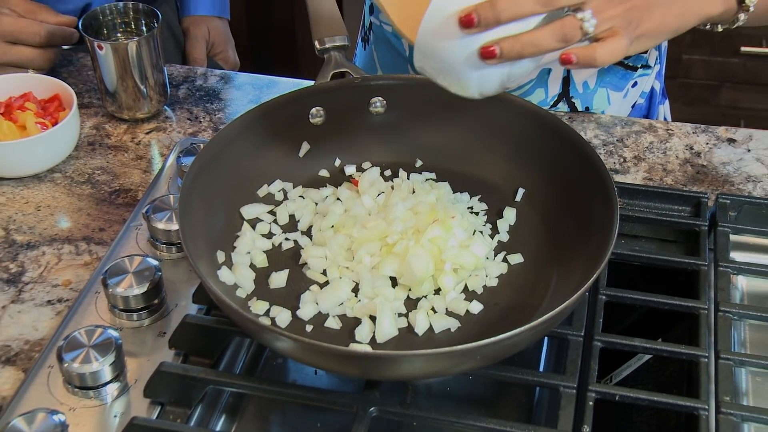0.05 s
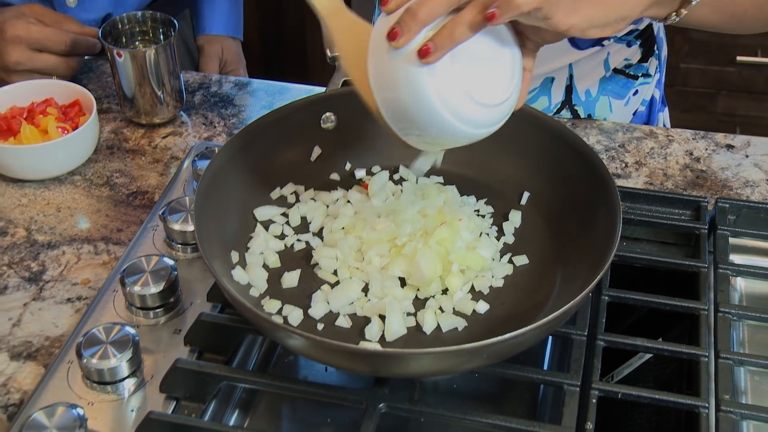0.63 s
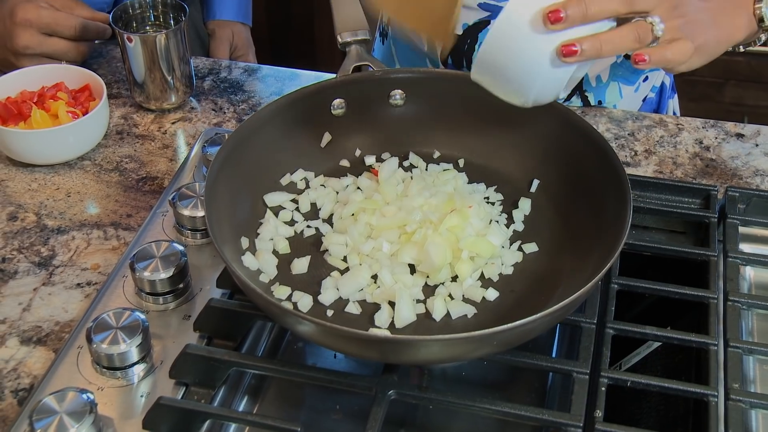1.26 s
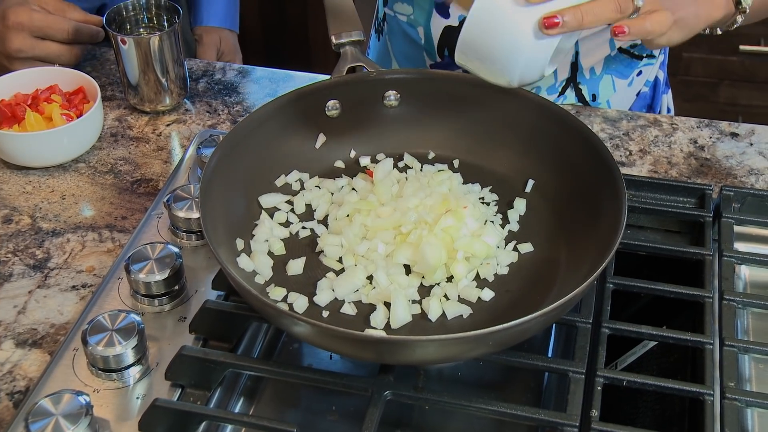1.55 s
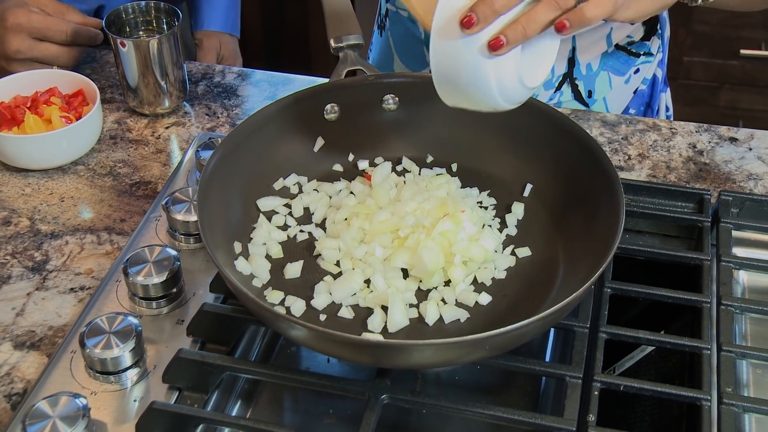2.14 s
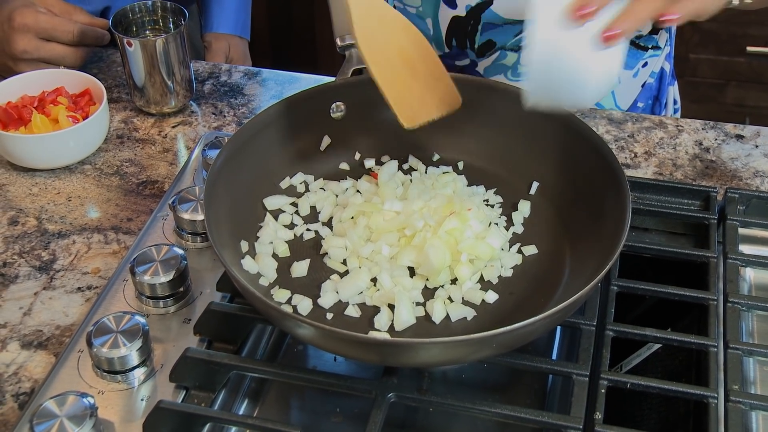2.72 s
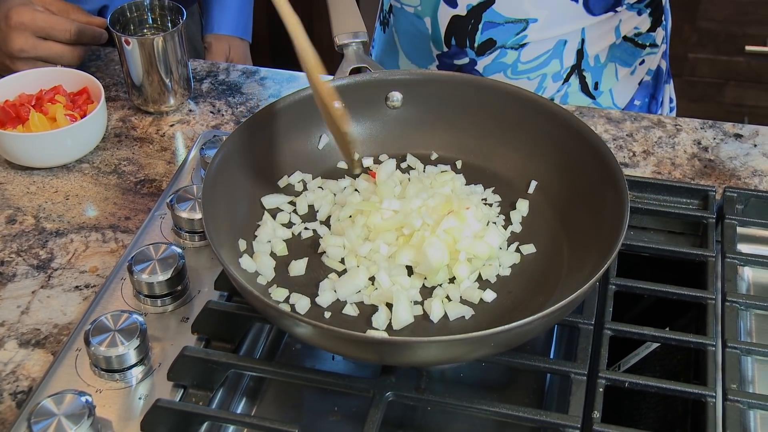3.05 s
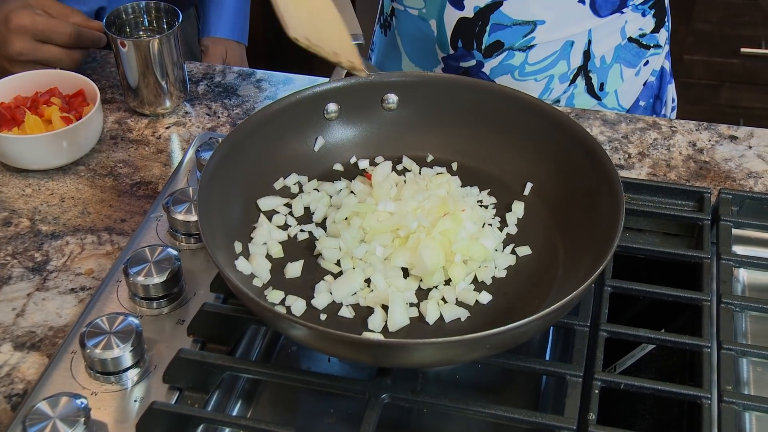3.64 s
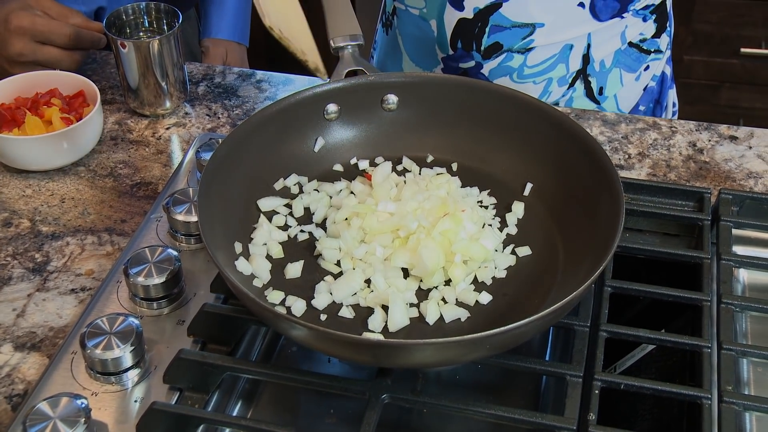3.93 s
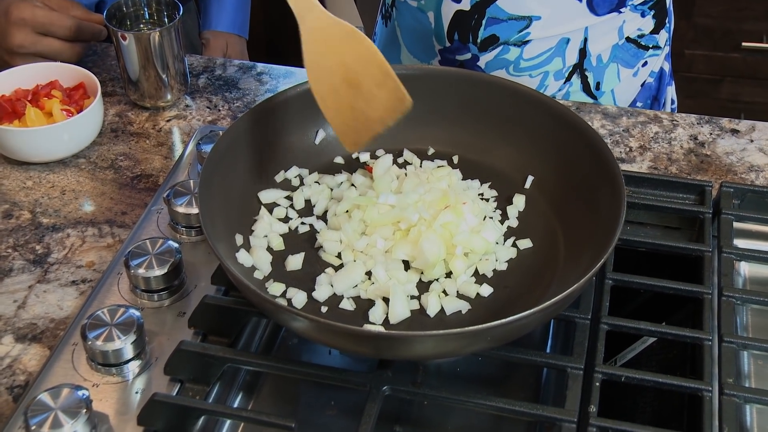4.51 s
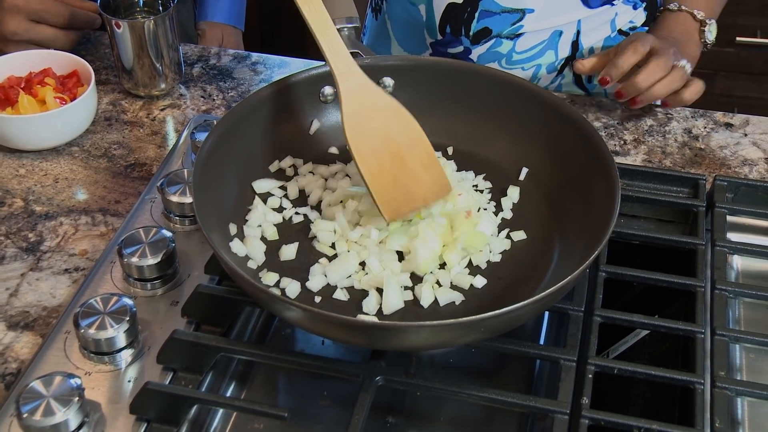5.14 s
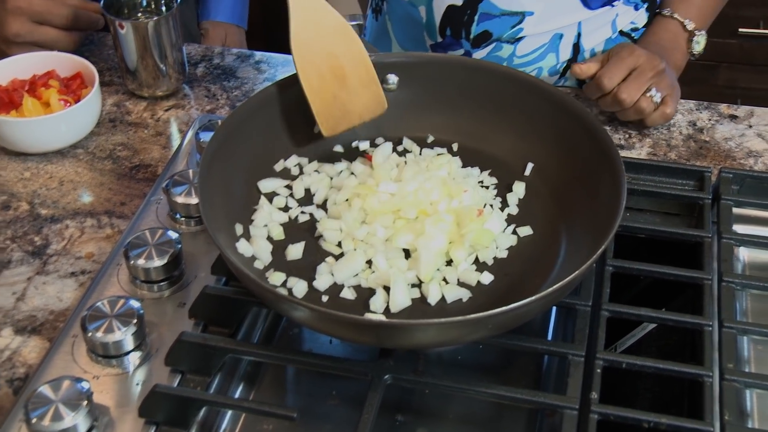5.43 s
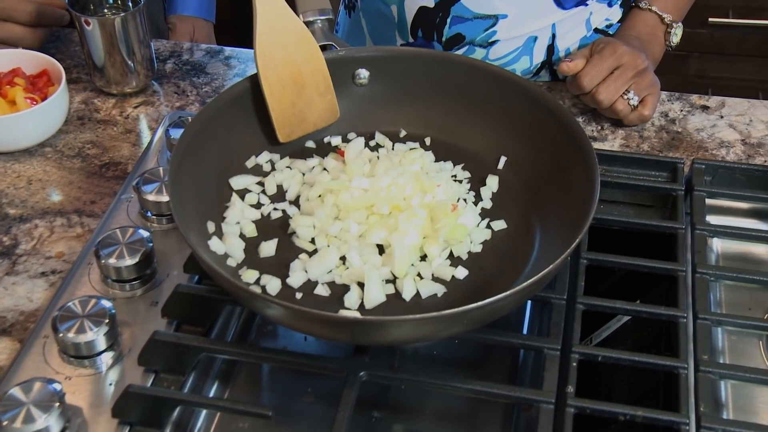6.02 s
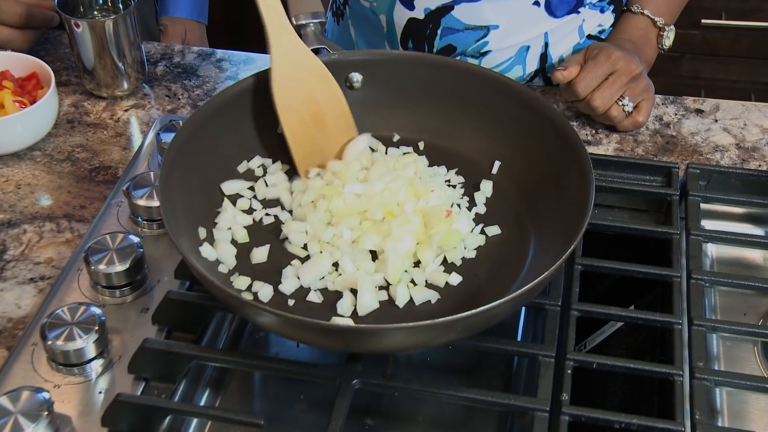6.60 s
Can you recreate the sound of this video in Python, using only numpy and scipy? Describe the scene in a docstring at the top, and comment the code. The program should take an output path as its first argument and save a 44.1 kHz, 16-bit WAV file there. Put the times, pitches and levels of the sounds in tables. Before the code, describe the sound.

Diced onions sizzle quietly in a frying pan, with a thin steam hiss, scattered spits and a faint burner rush underneath. A wooden spatula knocks irregularly on a hand-held china bowl, which clinks once. Later the spatula rubs faintly on the pan's rim, clicks against the pan and pushes into the onions with a short crunch, and the frying swells. One microphone stands by the stove in a small kitchen.

```python
"""Diced onion sizzles quietly in a frying pan: tiny bubbles burst, steam hisses, droplets spit.
One microphone by the stove in a small kitchen, with the burner's soft rush underneath.
A wooden spatula knocks the last pieces out of a hand-held china bowl, which clinks once; it then
rubs on the pan's rim, taps the pan and shoves into the onions, and the frying flares up.
Cupboards and counter answer each knock with a short tail."""
import sys
import numpy as np
from scipy import signal
from scipy.fft import rfft, irfft
from scipy.io import wavfile
from scipy.ndimage import uniform_filter1d

SR = 44100
rng = np.random.default_rng(int(sys.argv[2]) if len(sys.argv) > 2 else 0)


def inscribe(sig):
    """Save sig as 16-bit PCM at rate SR to the path in sys.argv[1].

    A 1-D sig is mono; a 2-D sig holds one channel per row.
    Samples are clipped to [-1, 1] before scaling.
    """
    pcm = np.round(np.clip(np.atleast_2d(sig).T, -1, 1) * 32767)
    wavfile.write(sys.argv[1], SR, pcm.astype(np.int16))


N = 302823
TIME = np.arange(N) / SR
SHOVE_S = 6.715  # the spatula pushes into the heap

# pan resonances that colour the frying: f/Hz, width/Hz, level/dB
FRYING_MODES = [(1580, 234, -8.5), (2130, 270, -2), (2450, 155, 3.5), (2753, 204, -1), (3373, 366, -3),
                (3920, 470, -5.5), (5350, 420, -8), (6560, 310, -11)]
# low modes of the pan on its grate: f/Hz, width/Hz, level/dB
PAN_MODES = [(236.3, 16, -3.5), (309.8, 11, -2), (346, 20, -13.5), (418, 31, -11.5), (489.7, 6.2, -4),
             (604, 5.4, -1.5), (663, 21, -14.5), (771, 15, -10.5), (940, 57, -17.5)]
# modes of the china bowl, damped by the hand: f/Hz, width/Hz, level/dB
BOWL_MODES = [(660, 180, -25), (1468, 38, 2.5), (1480, 1.6, -2), (1525, 1.46, 0.5), (1580, 89, -3.5),
              (1784, 110, -10), (2020, 110, -11.5), (2250, 110, -9.5), (2535, 36, -3), (2700, 17, -1.5),
              (2770, 96, -11), (3590, 92, -9.5), (3706, 9.4, 3), (3790, 45, -8), (4170, 150, -13),
              (4400, 170, -20.5), (5380, 200, -21), (5640, 120, -23), (6410, 70, -21), (6750, 240, -19),
              (8540, 160, -32), (9740, 250, -26)]


def undb(db):
    """Decibels to gain."""
    return 10 ** (np.asarray(db) / 20)


def unit(x):
    """Scale to an rms of one."""
    return x / np.sqrt(np.mean(x ** 2))


def peak(x):
    """Scale to a peak of one."""
    return x / np.abs(x).max()


def colour(x, points):
    """Minimum-phase filter through points of f/Hz, level/dB."""
    hz, db = np.transpose(points)
    size = 4096
    log_hz = np.log(np.fft.rfftfreq(size, 1 / SR) + 1)
    log_gain = np.log(undb(np.interp(log_hz, np.log(hz), db)))
    cepstrum = irfft(log_gain)[:size // 2]
    cepstrum[1:] *= 2
    response = irfft(np.exp(rfft(cepstrum, size)))
    return signal.fftconvolve(x, response)[:len(x)]


def band(x, hz, width_hz):
    """One resonance, gain one at its centre."""
    return signal.lfilter(*signal.iirpeak(hz, hz / width_hz, fs=SR), x + 1e-18)


def ring(x, modes):
    """A body's resonances, alternating in sign from mode to mode."""
    return sum((-1) ** k * undb(db) * band(x, hz, width) for k, (hz, width, db) in enumerate(modes))


def cut(x, hz, kind="low", order=2):
    """Low-pass or high-pass."""
    return signal.sosfilt(signal.butter(order, hz, kind, fs=SR, output="sos"), x + 1e-18)


def impulse(size=32768):
    """A single blow."""
    return signal.unit_impulse(size)


def fade(t60, size=32768):
    """Noise of unit energy that falls 60 dB in t60 seconds."""
    tail = rng.standard_normal(size) * undb(-60 * np.arange(size) / SR / t60)
    return tail / np.linalg.norm(tail)


def add(out, s, sound):
    """Mix a sound in at time s."""
    start = max(int(s * SR), 0)
    out[start:start + len(sound)] += sound[:N - start]


def walk(hz):
    """Random wander with an rms of one, turning hz times a second."""
    hold = int(SR / hz)
    steps = np.repeat(rng.standard_normal(N // hold + 1), hold)[:N]
    return unit(uniform_filter1d(steps, hold))


def grains(per_s, spread_db):
    """Tiny clicks of random time, size and sign."""
    happens = rng.random(N) < per_s / SR
    sizes = undb(spread_db * np.minimum(rng.exponential(size=N), np.log(per_s / 4)))
    return unit(happens * sizes * rng.choice([-1, 1], N))


def stroke(s, db, rise_db_per_s, fall_db_per_s):
    """Gain of a push that swells to its peak at time s and dies away."""
    return undb(db - np.maximum((s - TIME) * rise_db_per_s, (TIME - s) * fall_db_per_s))


def strikes(blows, modes, grit_db, grit_t60):
    """Hard, slightly gritty contacts ring a body."""
    out = np.zeros(N)
    for s, db in blows:
        contact = impulse() + undb(grit_db) * fade(grit_t60)
        add(out, s, undb(db) * peak(ring(contact, modes)))
    return out


def kitchen(x, wet_db, t60):
    """The direct sound plus a diffuse tail off cupboards and counter; the treble dies sooner."""
    # tone of the reverberation: f/Hz, level/dB
    room_tone = [(100, -6), (500, 1.5), (1300, -5.5), (3000, -2.5), (8000, -0.5), (16000, -33)]
    tail = cut(fade(t60), 4070, order=4) + cut(fade(0.19 * t60), 3460, "high", order=4)
    onset = 1 - np.exp(-TIME[:len(tail)] / 0.00057)
    tail = colour(tail, room_tone) * onset
    return x + undb(wet_db) * signal.fftconvolve(x, tail)[:N]


def burner():
    """In the background, the flame's soft rush, which also hums in the pan."""
    # spectrum of burner and kitchen air: f/Hz, level/dB
    air_spectrum = [(25, -21), (50, -24), (75, -19), (95, -9), (135, -2.5), (160, -7.5), (185, -1),
                    (280, -20.5), (400, -12.5), (650, -8.5), (1000, -13), (1400, -14.5), (3000, -21)]
    rush = unit(colour(rng.standard_normal(N), air_spectrum)) * undb(-60.5 + 0.33 * walk(5.69))
    hum = unit(cut(ring(rng.standard_normal(N), PAN_MODES), 810, "high", order=1))
    return rush + undb(-66.5) * hum


def pan_bumps():
    """Soft pushes reach only the pan's low modes."""
    # bumps on the pan: t/s, level/dB, centre f/Hz
    bumps = [(1.934, -41.5, 119), (3.958, -41, 285), (4.259, -42, 690), (5.017, -45.5, 259),
             (6.688, -30, 900), (6.777, -36, 240)]
    out = np.zeros(N)
    for s, db, hz in bumps:
        push = cut(band(impulse() + fade(t60=0.037), hz, hz), 2 * hz)
        thud = cut(ring(push, PAN_MODES) + 0.17 * push, 85, "high", order=4)
        add(out, s, undb(db) * peak(thud))
    return out


def rim_rub():
    """Wood sticks and slips along the rim in one juddering stroke."""
    loudest_s, judder_hz, judder_db = 4.265, 13, 1
    drag = grains(per_s=630, spread_db=-1.5)
    # the drag drives the pan's main bending mode hardest, its pitch wavering with the grip
    groan_hz = 302 + 12 * walk(45)
    groan = unit(np.sin(2 * np.pi * np.cumsum(groan_hz) / SR) * undb(3.9 * walk(60)))
    body = unit(cut(ring(drag, PAN_MODES), 1140, order=4))
    scrape = unit(cut(cut(band(drag, 310, 380), 170, "high"), 980, order=8))
    rub = unit(groan + undb(-8) * body + undb(-4.5) * scrape)
    judder = undb(judder_db * np.cos(2 * np.pi * judder_hz * (TIME - loudest_s)))
    return rub * judder * stroke(loudest_s, db=-40, rise_db_per_s=112, fall_db_per_s=105)


def shove():
    """The spatula pushes into the heap: the onion crunches briefly, the pan rumbles longer."""
    # resonances of the crunch: f/Hz, width/Hz, level/dB
    crunch_modes = [(165, 26, 0.5), (226, 27, 5.5), (562, 100, -4.5), (683, 97, 5), (926, 66, 2.5),
                    (1163, 76, 2), (1410, 180, -8), (1660, 180, -0.5), (2200, 120, -4.5), (2550, 330, -9.5),
                    (3400, 96, -13)]
    slips = grains(per_s=1100, spread_db=-1.5)
    rumble = unit(cut(ring(slips, PAN_MODES), 900))
    rumble *= stroke(SHOVE_S, db=-43.5, rise_db_per_s=190, fall_db_per_s=85)
    crunch = unit(cut(ring(slips, crunch_modes), 3200, order=4))
    crunch *= stroke(SHOVE_S, db=-29, rise_db_per_s=425, fall_db_per_s=209)
    return rumble + crunch


def pan_taps():
    """The spatula's tip clicks on the pan and sets all of it ringing faintly."""
    # contacts of the tip: t/s, level/dB
    taps = [(6.5275, -18), (6.5327, -26), (6.635, -47), (6.643, -34)]
    # resonances of the click: f/Hz, width/Hz, level/dB
    tip_modes = [(746, 23, -6), (1530, 100, -8), (2130, 270, -2.5), (2690, 200, 4), (4230, 310, -17.5),
                 (5500, 360, -15), (7000, 500, -19.5)]
    click = strikes(taps, tip_modes, grit_db=-10, grit_t60=0.02)
    boom = strikes(taps, PAN_MODES, grit_db=-1, grit_t60=0.034)
    return click + undb(-22) * boom


def bowl_clink():
    """One hard contact and its quick rebounds ring the china."""
    # contact and rebounds: t/s, level/dB
    contacts = [(1.5597, -13.5), (1.5655, -25), (1.5735, -14)]
    return strikes(contacts, BOWL_MODES, grit_db=-5, grit_t60=0.05)


def bowl_knocks():
    """Wood on the held bowl gives a hollow clop, a hard crack and a dull thud."""
    # knocks: t/s, level/dB, crack level/dB, thud level/dB (the last two against the clop)
    knocks = [(0.0716, -32, 5, 6.5), (0.1151, -24.5, -4, -8.5), (0.3287, -41.5, -1, 8),
              (0.3919, -33, 16, 2), (0.452, -30, -0.5, -2), (0.6209, -16, -12.5, -19.5),
              (0.9284, -6.5, -2.5, -17), (2.143, -11, 15, -6), (2.257, -23.5, -18, -16),
              (2.5814, -26, -8, -14), (2.6516, -35.5, 22, -20)]
    # hollow resonances of wood in the cupped bowl: f/Hz, width/Hz, level/dB
    clop_modes = [(715, 304, -10), (937, 355, -5.5), (1207, 142, 4), (1580, 170, -17)]
    # resonances that a harder edge adds: f/Hz, width/Hz, level/dB
    crack_modes = [(1476, 89, -7), (2130, 560, 1.5), (2450, 246, 6.5), (2870, 340, -3.5), (4140, 56, 0)]
    china = peak(ring(impulse(), BOWL_MODES))
    crack = peak(ring(impulse(), crack_modes)) + undb(-11) * china
    thud = peak(cut(cut(band(impulse(), 685, 630), 240, "high"), 1020))
    out = np.zeros(N)
    for s, db, crack_db, thud_db in knocks:
        # each knock lands elsewhere and weights the modes anew
        modes = np.array(clop_modes) + np.outer(rng.standard_normal(len(clop_modes)), [0, 0, 1])
        clop = peak(cut(ring(impulse(), modes), 430, "high"))
        knock = clop + undb(crack_db) * crack + undb(thud_db) * thud
        knock = peak(cut(knock, 3170, order=8))  # wood is too soft to excite the treble
        scatter = signal.fftconvolve(knock, fade(t60=0.16))
        add(out, s - 0.0068, undb(db - 10) * knock)  # weak direct path to the microphone
        add(out, s - 0.006, undb(db - 4.5) * scatter)
        add(out, s - 0.0004, undb(db) * knock)  # strong reflection off the pan
    return out


def spits(faint_per_s=4.6):
    """Each droplet bursts with a bright snap and a pop in the pan's modes; the loudest are mostly snap."""
    # the loudest droplets: t/s, level/dB, body level/dB against the bright snap
    loud_spits = [(0.337, -33, 5), (1.7335, -22.5, -17), (1.9812, -34, 4), (3.149, -28.5, -9.5),
                  (4.026, -34, 9), (4.112, -31, -13), (4.3913, -32, -3), (4.44, -33.5, -6),
                  (4.7465, -25.5, -13), (5.018, -29, -12), (5.314, -24.5, -11), (5.88, -24, -17),
                  (5.966, -26, -27), (6.317, -34, 9), (6.635, -29.5, -4.5)]
    # fainter droplets at random moments, in the same columns
    chance = rng.uniform(-1, 1, (int(faint_per_s * N / SR), 3))
    middle_s = N / SR / 2
    faint_spits = [middle_s, -36, 2.5] + chance * [middle_s, 1.5, 4.5]
    out = np.zeros(N)
    for s, db, body_db in [*loud_spits, *faint_spits]:
        snap = impulse() + undb(1.5) * fade(t60=0.0067)
        bright = peak(cut(band(snap, 10300, 7600), 4400, "high"))
        body = peak(ring(snap, FRYING_MODES) + 0.17 * band(snap, 2900, 2700))
        add(out, s, undb(db) * peak(bright + undb(body_db) * body))
    return out


def sizzle():
    """Close up, countless micro-bubbles burst under the onion; the finest merge into a steam hiss."""
    # spectrum of the steam: f/Hz, level/dB
    hiss_spectrum = [(1500, -22.5), (4600, -18), (6200, -11.5), (7100, -9), (8700, -2), (9700, -8),
                     (11050, -0.5), (11900, -2.5), (12600, -1.5), (13900, -9), (15000, -0.5), (16000, -5)]
    # the cold onion cools the pan, so steam and wet frying both ebb
    steam_ebb_db_per_s, frying_ebb_db_per_s = 0.39, 0.34
    # the shove puts fresh onion on hot metal and the frying flares up
    flare_db = 4.5 * np.clip(1 + (TIME - SHOVE_S) / 0.14, 0, 1)
    bursts = grains(per_s=1800, spread_db=4)
    steam = unit(colour(rng.standard_normal(N) + undb(-5.5) * bursts, hiss_spectrum))
    steam *= undb(-45.5 - steam_ebb_db_per_s * TIME + 0.45 * flare_db + 0.63 * walk(11))
    bubbles = grains(per_s=500, spread_db=1.5) + undb(-6) * bursts + undb(4.5) * rng.standard_normal(N)
    frying = unit(cut(ring(bubbles, FRYING_MODES), 1560, "high"))
    frying *= undb(-52 - frying_ebb_db_per_s * TIME + flare_db + 0.5 * walk(12) + 0.5 * walk(40))
    return steam + frying


def scene():
    """Mono, by the stove: sizzle and burner stay dry, while spits and handling carry the room."""
    hard = kitchen(bowl_clink() + pan_taps(), wet_db=-1, t60=0.59)
    hollow = kitchen(bowl_knocks() + spits(), wet_db=-10, t60=0.67)
    pushes = pan_bumps() + cut(rim_rub() + shove(), 110, "high")
    soft = kitchen(pushes, wet_db=-6, t60=0.43)
    return (sizzle() + burner() + hard + hollow + soft)[None]


def record(dry):
    """The recorder thins the deep bass and cuts the top steeply."""
    bass_hz, top_hz = 45, 15750
    top_cut = signal.ellip(12, 0.1, 70, top_hz, fs=SR, output="sos")
    return signal.sosfilt(top_cut, cut(dry, bass_hz, "high"))


dry = scene()
out = record(dry)
inscribe(out)
```